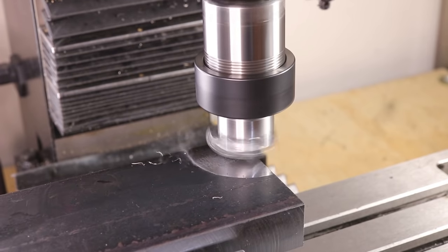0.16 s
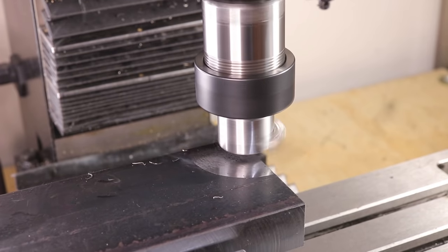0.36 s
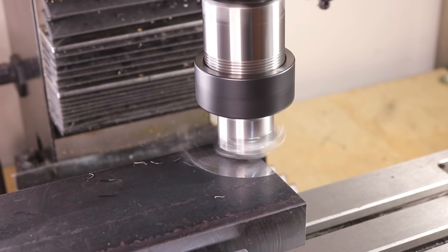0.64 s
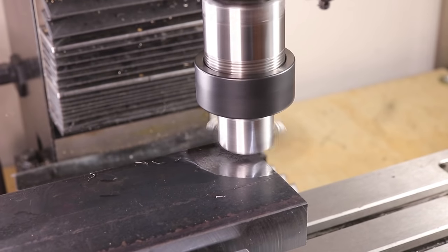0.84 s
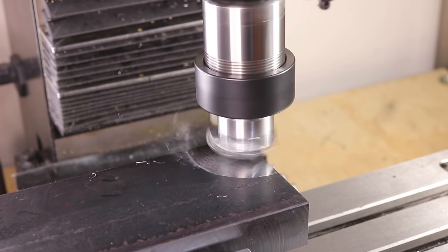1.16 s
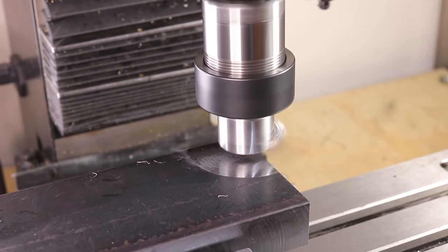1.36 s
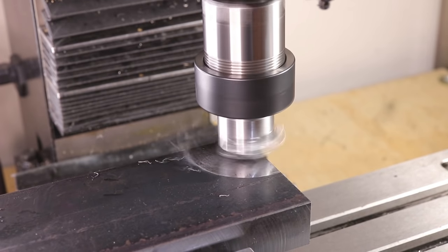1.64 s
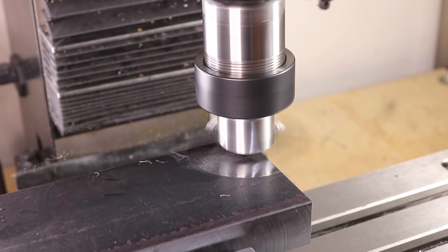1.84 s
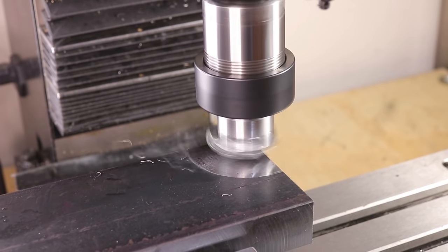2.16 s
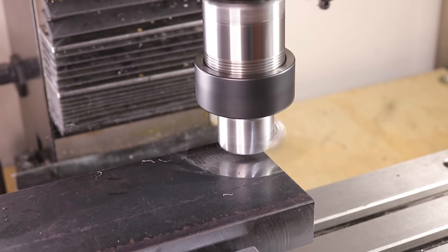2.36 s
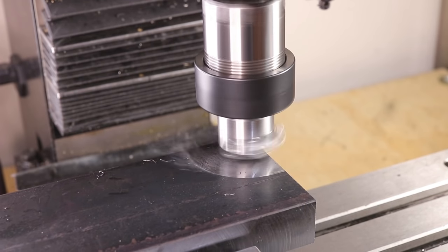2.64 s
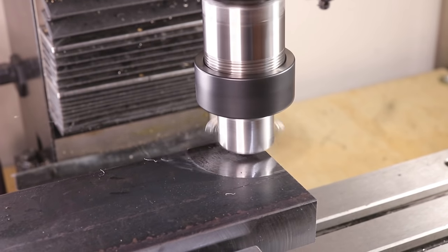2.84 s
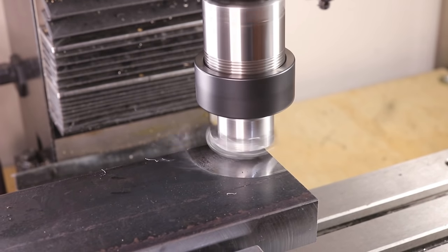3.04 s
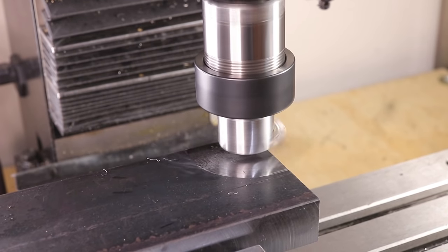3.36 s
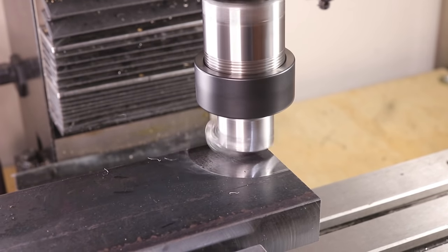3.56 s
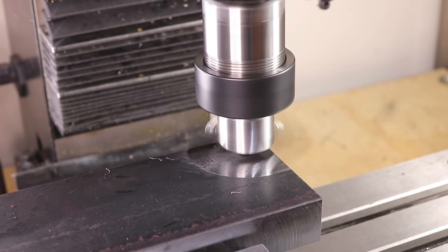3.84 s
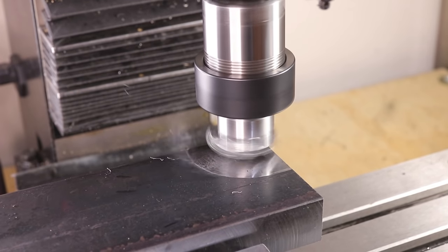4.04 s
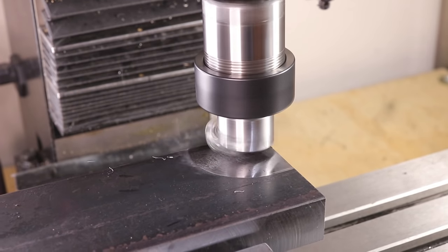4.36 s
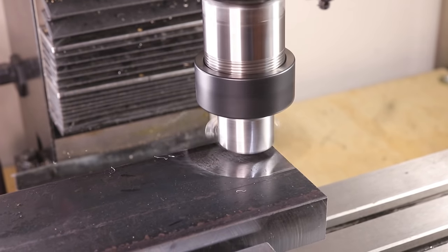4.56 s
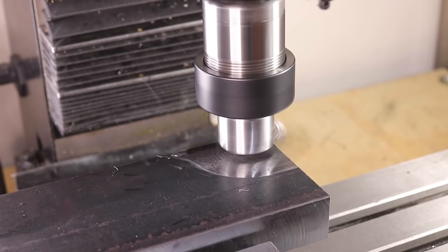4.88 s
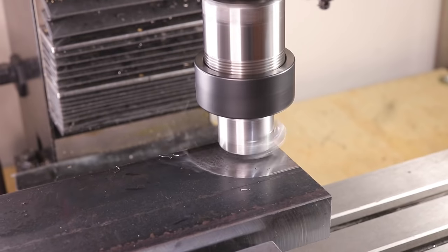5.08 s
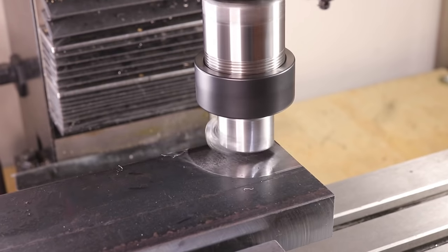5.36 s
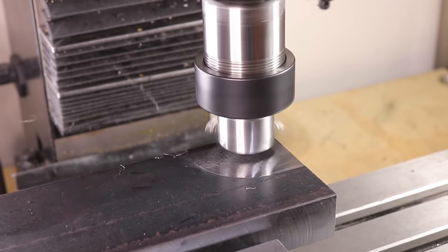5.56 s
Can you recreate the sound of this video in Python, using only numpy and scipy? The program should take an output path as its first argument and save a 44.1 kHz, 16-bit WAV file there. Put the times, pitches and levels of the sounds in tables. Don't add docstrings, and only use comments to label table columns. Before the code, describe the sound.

A small milling machine sweeps a single cutter over steel, ticking and rasping eight times a second over a low drone, then doubling in speed and pitch.

```python
import sys
import numpy as np
from scipy import signal
from scipy.fft import rfft, irfft, next_fast_len
from scipy.io import wavfile
from scipy.ndimage import uniform_filter1d

SR = 44100
rng = np.random.default_rng(int(sys.argv[2]) if len(sys.argv) > 2 else 0)


def nominal_scale(level):
    x = np.asarray(level, float) / 20
    return 10 ** x


def store_wav(level_fs):
    pcm = np.round(np.clip(np.atleast_2d(level_fs), -1, 1) * 32767)
    wavfile.write(sys.argv[1], SR, pcm.T.astype(np.int16))


N = 251811
FAST_FROM_S = 4.2265
FAST_FROM = round(FAST_FROM_S * SR)
LEAD = 8000
M = LEAD + 2 * N - FAST_FROM
TOP_HZ = 16330

# start_s, whirr_db
WHIRR_LEVEL = [(0, -35.5), (.19, -34.5), (.91, -38.5), (1.12, -37), (1.84, -40), (2.32, -41.5),
               (2.91, -40.5), (3.33, -38), (4.06, -41.5), (4.3, -40), (4.95, -40.5), (5.71, -42)]
# freq_hz, level_db (per Hz)
HUM_COLOUR = [(12, -70), (35, -35), (70, -30), (150, -28.5), (260, -21.5), (320, -2), (400, -3.5),
              (460, -6.5), (560, -19), (800, -50)]
# freq_hz, level_db (per Hz)
WHIRR_COLOUR = [(40, -55), (250, -24.5), (450, -4), (900, -7.5), (1600, -4.5), (2300, -11.5), (3400, -17.5),
                (4750, -31), (6400, -17.5), (10000, -25), (12000, -42), (16000, -50)]
# freq_hz, width_hz, boost_db
HOUSING_MODES = [(62, 12, 5.9), (75.6, 11, 3.3), (125, 14, 6.6), (189, 20, 6.6), (341.5, 5.6, 8.5),
                 (357.5, 6.4, 7.2), (391.6, 7.7, 6), (430.7, 14, 6.1), (550.8, 12.4, 8.3), (690, 20, 2.9),
                 (793, 12, 8.1), (872, 18, 12), (950, 56, 8.8), (1270, 13, 5.6), (1660, 25, 1.7),
                 (1730, 10, 4.3), (2010, 40, 1.8), (3523, 90, 8), (5250, 70, 12), (6860, 40, 11)]
# freq_hz, over_hum_db
MESH_LINES = [(341, -8.5), (360, -8), (397, -10.5), (800, -9.5), (878, -10), (965, -11)]
# freq_hz, level_db (per Hz)
GROAN_COLOUR = [(60, -26), (190, -16.5), (300, -16), (700, -2), (1100, -7), (1750, 1.5), (2300, -9.5),
                (3500, -35)]
# freq_hz, t60_s
SHOP_DECAY = [(300, 0.4), (2000, 0.63), (8000, 0.35), (15000, 0.35)]
# freq_hz, likeness (0 to 1)
STEREO_LIKENESS = [(60, 1), (130, 0.97), (290, 0.95), (640, 0.85), (1410, 0.45), (3100, 0.36), (6820, 0.24),
                   (15000, 0.42)]
# freq_hz, left_minus_right_db
STEREO_BALANCE = [(60, 1.5), (110, 0), (200, -0.5), (380, 1), (700, 0), (1290, -0.5), (2380, -2.5),
                  (4400, -3.0), (8120, -3), (15000, -1)]
# start_s, turns_made
SPINDLE_TURNS = [
    (-.0602, 0),
    (.5631, 5),
    (1.1893, 10),
    (2.5658, 21),
    (3.1934, 26),
    (4.1932, 34),
    (4.273, 35),
    (5.648, 57),
]
# start_s, tick_db
EDGE_BITE = [(.06, -27), (.44, -19), (.66, -21), (.9, -29), (1.31, -19.5), (1.76, -23), (1.95, -19.5),
             (2.33, -22.5), (2.58, -25.5), (2.85, -22), (3.07, -22), (3.19, -23), (3.32, -19.5), (3.7, -20),
             (3.94, -23), (4.19, -18.5), (4.27, -27), (5.7, -24)]
# peak_ms, freq_hz, width_hz, left_db, right_db
TICK_PACKETS = [
    (-1.2, 7300, 1500, -14, -11),
    (-.65, 8000, 2400, -13, -9),
    (0, 8700, 1900, -11, 0),
    (.9, 8800, 2200, -10, -9),
    (2.3, 8600, 1200, -16, -18),
    (3.3, 8300, 1300, -16, -14),
    (4.4, 8800, 1500, -17, -16),
]
# freq_hz, level_db (per Hz)
CHIP_COLOUR = [(100, -38), (300, -23.5), (1000, -8), (2000, -13), (3200, -11), (4800, -14), (6200, -5.5),
               (8200, -8), (10000, -9.5), (11200, -13), (14000, -20), (16000, -35.5)]
# freq_hz, width_hz, boost_db
TOOL_MODES = [(3172, 273, 9.4), (4370, 200, 6.8), (5190, 160, 8.1), (5860, 48, 7.8), (6050, 115, 8),
              (6820, 210, 5.9), (7330, 144, 9.4), (8210, 320, 7.4), (9260, 230, 7.8), (10100, 176, 11.7),
              (12050, 300, 6.8)]
# start_s, chatter_db, knock_db, knock_hz
ODD_PASSES = [(.065, -25, -20.5, 1660), (.189, -28, -28, 1970), (.314, -28, -28.5, 1930),
              (.439, -25.5, -21, 1740), (.563, -25, -24, 1760), (1.44, -22, -22.5, 1740),
              (1.565, -24, -22.5, 1660), (1.69, -31.5, -43, 1400), (1.815, -21, -19.5, 1690),
              (1.94, -28.5, -38, 1790), (2.065, -36, -23, 1750), (2.19, -27.5, -29, 1870),
              (2.316, -27, -22, 1700), (2.441, -28.5, -15.5, 1715), (2.566, -24, -19.5, 1770),
              (2.691, -23, -22, 1760), (2.817, -30.5, -29, 1770), (2.943, -30, -23.5, 1860),
              (3.068, -28.5, -23.5, 1660), (3.193, -27.5, -18, 1680), (3.319, -25.5, -18.5, 1770),
              (3.444, -37.5, -31, 1760), (3.569, -28.5, -22.5, 1750), (3.694, -32, -18.5, 1730),
              (3.818, -30.5, -28.5, 1840), (3.944, -29, -23.5, 1660), (4.068, -26.5, -30, 1730)]
# start_s, chatter_db, knock_db, knock_hz (before doubling)
ODD_FAST_PASSES = [(4.273, -34, -27, 1930), (4.335, -26.5, -33, 1960), (4.398, -26.5, -30, 1870),
                   (4.46, -22, -18.5, 1750), (4.523, -28.5, -29.5, 1930), (4.711, -33, -21.5, 1790),
                   (4.898, -32, -22.5, 1660), (5.023, -25.5, -29, 1680), (5.148, -26, -42, 1800),
                   (5.21, -33, -22, 1750), (5.273, -35.5, -30, 1770), (5.336, -24.5, -34, 1700),
                   (5.398, -24.5, -29, 1660), (5.461, -23, -37, 1800), (5.523, -22.5, -33, 1660),
                   (5.586, -32, -27, 1700), (5.648, -23, -26, 1870)]
# freq_hz, level_db, t60_s, delay_ms
FRAME_MODES = [(195, -33.5, 0.11, 2.5), (315, -15, 0.096, 3), (631, -16, 0.071, 2.5), (720, -8.5, .07, 6),
               (881, -12.5, 0.062, 4.5), (980, -26, 0.05, 3), (1243, -15, 0.068, 6),
               (1401, -16.5, 0.07, 5.5), (1600, -6, .05, 1.5), (1770, -5.5, 0.093, 1),
               (1930, -6.5, 0.056, 0), (2346, -10, 0.082, 1.5), (3170, -24, 0.036, 1.5),
               (3510, -18.5, 0.072, 2)]
FRAME_PART_HZ = [800, 1300, 1760, 2370]
# start_s, table_db, vice_db
EXIT_SHAKES = [(.065, -2, 6), (.189, -4, 2.5), (.314, -5, -8), (.439, 4, 1.5), (1.064, 3.5, -9),
               (1.189, 3.5, 6), (1.314, 6, 6), (1.69, -8, 6), (1.815, -1, 8), (1.94, 3, -4),
               (2.316, 1.5, 3.5), (2.441, .1, 8), (2.566, -2, 5.5), (2.691, 2.5, -8), (2.943, 0, -9),
               (3.193, 4.5, 3), (3.444, 1, .1), (4.273, 2.5, 6.5), (4.46, -10, -7), (4.648, 4, -2),
               (5.023, -2, 7.5), (5.085, 4, -3), (5.273, -2, 5), (5.336, 2, -8), (5.398, -0.5, -9),
               (5.461, -1, -8), (5.523, -3, -6), (5.586, -7, -3)]


def sample_at(s):
    return LEAD + SR * (s + np.maximum(np.asarray(s) - FAST_FROM_S, 0))


def at_hz(points, hz):
    point_hz, value = np.array(points).T[:2]
    return np.interp(np.log(hz + 1), np.log(point_hz + 1), value)


def drift(rate):
    knots = uniform_filter1d(np.repeat(rng.standard_normal(3000), 3), 4)
    place = np.arange(M) * (3 * min(rate, 390) / SR)
    return 1.25 * np.interp(place, np.arange(len(knots)), knots)


def coloured(white, spectrum, peaks):
    size = next_fast_len(M)
    hz = np.arange(size // 2 + 1) * SR / size
    resonance_db = sum(db / (1 + ((hz - f) / width * 2) ** 2) for f, width, db in peaks)
    mid, diff = rfft(white, size) * nominal_scale(at_hz(spectrum, hz) + resonance_db)
    alike = np.clip(at_hz(STEREO_LIKENESS, hz), 0, 1)
    side = np.array([[1], [-1]])
    pair = np.sqrt(1 + alike) * mid + side * np.sqrt(1 - alike) * diff
    out = irfft(pair * nominal_scale(side * at_hz(STEREO_BALANCE, hz) / 2), size)[:, :M]
    return out / out.std()


def burst(hz, width_hz):
    t = np.arange(1200) / SR
    shape = t ** 3 * np.exp(-4 * width_hz * t)
    return shape / shape.max() * np.sin(2 * np.pi * hz * t)


def add(out, wave, at):
    at = int(at)
    out[..., at:at + wave.shape[-1]] += wave[..., :M - at]


def passes():
    at_s, turns = np.transpose(SPINDLE_TURNS)
    s = np.interp(np.arange(turns[-1] + 1), turns, at_s)
    usual_chatter_db, usual_knock_db, usual_knock_hz = -26, -25, 1760
    rows = np.tile([usual_chatter_db, usual_knock_db, usual_knock_hz], (len(s), 1)).astype(float)
    for odd_s, *row in list(ODD_PASSES) + list(ODD_FAST_PASSES):
        rows[np.argmin(abs(s - odd_s))] = row
    chatter_db, knock_db, knock_hz = rows.T
    return dict(
        entry=sample_at(s), tick_db=np.interp(s, *np.transpose(EDGE_BITE)),
        hiss_db=-41 + 5.5 * np.exp(-s / 1.36),
        chatter_db=chatter_db, knock_db=knock_db, knock_hz=knock_hz,
        cut_ms=38.3 + 0.4526 * s - 0.12 * (chatter_db - usual_chatter_db))


def load(level_db, rise_db, bend, release_s, bite_ms):
    cut = passes()
    out, t_ms = np.zeros(M), np.arange(4000) / SR * 1000
    for at, db, ms in zip(cut["entry"], level_db, cut["cut_ms"]):
        growing = rise_db * np.maximum(1 - t_ms / ms, 0) ** bend
        dying = 60 * np.maximum(t_ms - ms, 0) / 1000 / release_s
        add(out, nominal_scale(db - growing - dying) * (1 - np.exp(-t_ms / bite_ms)), at - 40)
    return out


def workshop(x):
    size = next_fast_len(M + SR // 2)
    hz = np.arange(size // 2 + 1) * SR / size
    t60 = at_hz(SHOP_DECAY, hz)
    out = np.zeros((2, len(hz)), complex)
    for k, lag_s in enumerate(rng.uniform(.008, .03, 16)):
        echo = nominal_scale(-60 * lag_s / t60) * np.exp(-2j * np.pi * hz * lag_s)
        out[k % 2] += echo / (1 - echo) * (-1) ** (k // 2)
    return irfft(out * rfft(x, size), size)[:, :M]


def drive():
    s, whirr_db = np.transpose(WHIRR_LEVEL)
    hum_db = -41.5 - 1.11 * s
    hum_db += (3.5 - 2 * (s - FAST_FROM_S)) * (s > FAST_FROM_S)
    hum_gain, whirr_gain = (nominal_scale(np.interp(np.arange(M), sample_at(s), db)) for db in (hum_db, whirr_db))
    mesh = np.zeros(M)
    for hz, db in MESH_LINES:
        level = nominal_scale(db + 3.1 * drift(9))
        mesh += level * np.sin(2 * np.pi * np.cumsum(hz + 2.6 * drift(12)) / SR)
    hum = coloured(rng.standard_normal((2, M)), HUM_COLOUR, HOUSING_MODES) * nominal_scale(0.93 * drift(6.1))
    whirr = coloured(rng.standard_normal((2, M)), WHIRR_COLOUR, HOUSING_MODES) * nominal_scale(1.14 * drift(30))
    return hum_gain * (mesh + hum) + whirr_gain * whirr


def groan():
    shake = coloured(rng.standard_normal((2, M)), GROAN_COLOUR, HOUSING_MODES)
    return shake * load(passes()["hiss_db"] + 4, rise_db=16.5, bend=1.0, release_s=0.15, bite_ms=4.4)


def knocks():
    cut = passes()
    entry, knock_db = cut["entry"], cut["knock_db"]
    mean_db, spread_db = [1.5, 5, 0, -0.4], [1.75, 2, 0, 1.8]
    parts_db = mean_db + spread_db * rng.standard_normal((len(entry), len(FRAME_PART_HZ)))
    parts_db[:, 2] = .5 * (knock_db + 28.5)
    for s, *extra_db in EXIT_SHAKES:
        parts_db[np.argmin(abs(entry - sample_at(s))), :2] = np.add(mean_db[:2], extra_db)
    out, t = np.zeros((2, M)), np.arange(3600) / SR
    luck = rng.standard_normal((len(entry), len(FRAME_MODES), 3))
    turns = zip(entry, cut["cut_ms"], knock_db, cut["knock_hz"], parts_db, luck)
    for at, ms, db, knock_hz, part_db, row in turns:
        free = at + (ms - 1.6) * SR / 1000
        add(out, nominal_scale(db) * burst(knock_hz, 405), free)
        for (hz, mode_db, t60, delay_ms), (strength, detune, skew) in zip(FRAME_MODES, row):
            phase = 2 * np.pi * hz * (1 + 0.018 * detune) * t + [[0], [skew * hz / 2500]]
            ring = nominal_scale(-60 * t / t60) * (1 - np.exp(-t / 0.0013)) * np.sin(phase)
            ring_db = -27.5 + 1.27 * np.interp(hz, FRAME_PART_HZ, part_db) + mode_db + 2.3 * strength
            add(out, nominal_scale(ring_db) * ring, free + delay_ms * SR / 1000)
    return out


def chatter():
    phase = 2 * np.pi * np.cumsum(6458 + 27 * drift(200)) / SR
    swell = load(passes()["chatter_db"] + 3, rise_db=42, bend=1.28, release_s=0.023, bite_ms=4.7)
    swell = swell * nominal_scale(2.75 * drift(200))
    return nominal_scale([[-3.5], [2.5]]) * swell * np.sin([phase + 0.92 * drift(60), phase])


def chip_hiss():
    sizes = nominal_scale(2.05 * np.minimum(rng.exponential(1, (2, M)), 4)) * rng.standard_normal((2, M))
    hiss_db = passes()["hiss_db"]
    tear = load(hiss_db + 12, rise_db=4.5, bend=0.42, release_s=0.075, bite_ms=9.6)
    snap = load(hiss_db + 9, rise_db=118, bend=0.47, release_s=0.016, bite_ms=1)
    late = load(hiss_db + 13.3, rise_db=9.5, bend=0.8, release_s=0.063, bite_ms=9.2)
    hiss = coloured(sizes, CHIP_COLOUR, TOOL_MODES)
    dull = signal.sosfiltfilt(signal.butter(4, 10800, fs=SR, output="sos"), hiss)
    bright = hiss - dull
    return (dull * tear + bright * late + hiss * snap) * nominal_scale(2.4 * drift(250))


def ticks():
    cut = passes()
    out = np.zeros((2, M))
    vary = rng.standard_normal((len(cut["entry"]), len(TICK_PACKETS)))
    for at, db, row in zip(cut["entry"], cut["tick_db"], vary):
        for (ms, hz, width, left_db, right_db), v in zip(TICK_PACKETS, row):
            start = at + (ms / 1000 - 3 / 4 / width - 1 / 10000) * SR
            level_db = np.array([[db + left_db + 9.0], [db + right_db + 11.8]])
            add(out, nominal_scale(level_db + 2 * v * (ms != 0)) * burst(hz, width), start)
    return out


def scene():
    cut = groan() + knocks() + chatter() + chip_hiss() + ticks()
    mill = drive() + nominal_scale(-21.0) * workshop(cut) + cut
    smooth = signal.sosfilt(signal.cheby2(12, 70, TOP_HZ * 0.58, fs=SR, output="sos"), mill)
    normal = mill[:, LEAD:LEAD + FAST_FROM]
    fast = nominal_scale(0.5) * smooth[:, LEAD + FAST_FROM::2]
    return np.hstack([normal, fast])[:, :N]


def band_limit(x):
    return signal.sosfilt(signal.butter(12, 16470, fs=SR, output="sos"), x)


def record(dry):
    top_cut = signal.sosfilt(signal.cheby2(20, 70, TOP_HZ, fs=SR, output="sos"), dry)
    return band_limit(top_cut)


dry = scene()
out = record(dry)
store_wav(out)
```